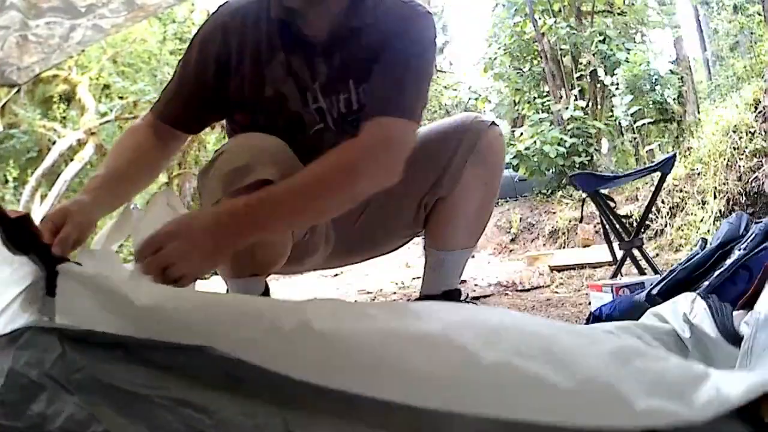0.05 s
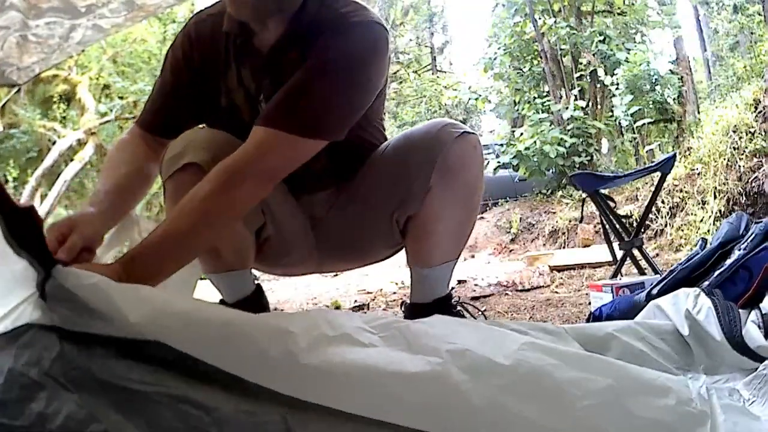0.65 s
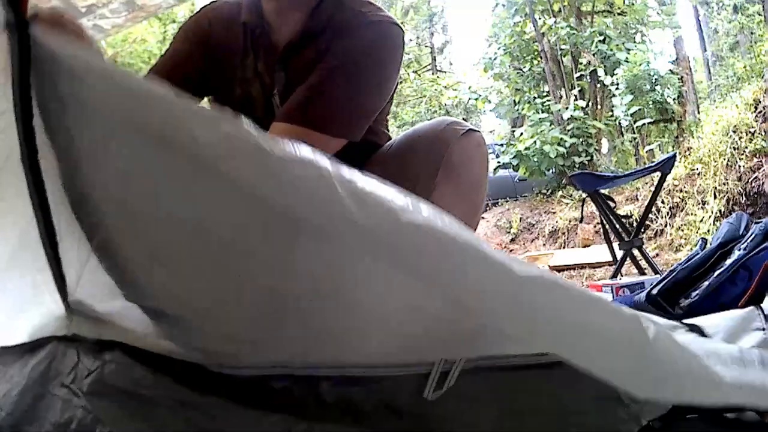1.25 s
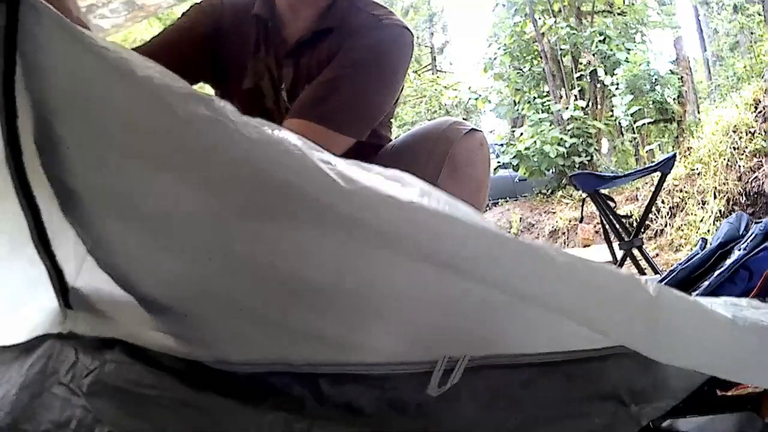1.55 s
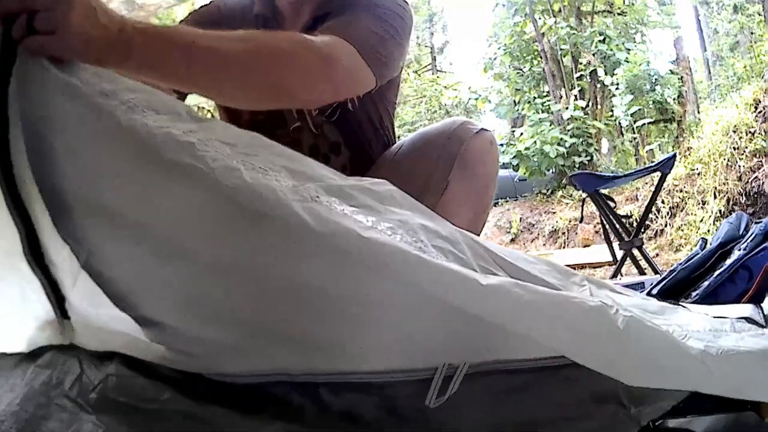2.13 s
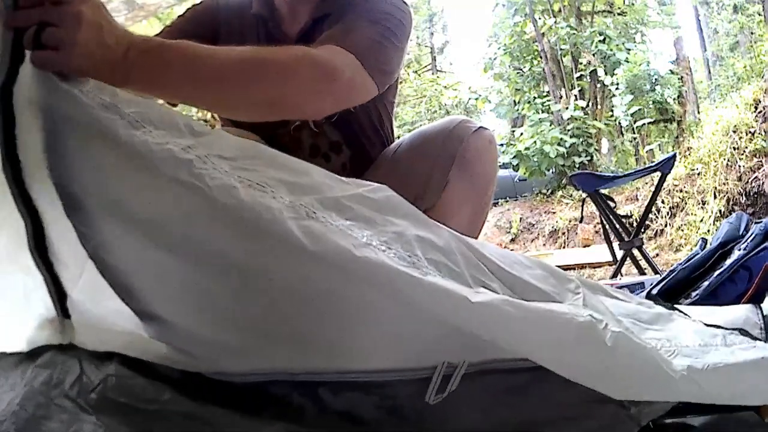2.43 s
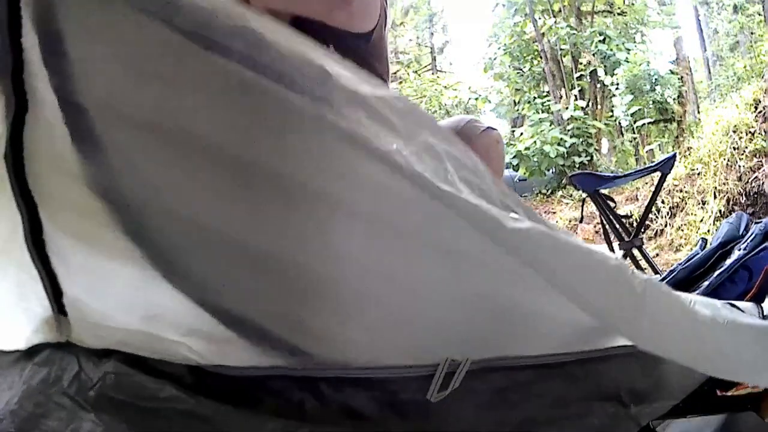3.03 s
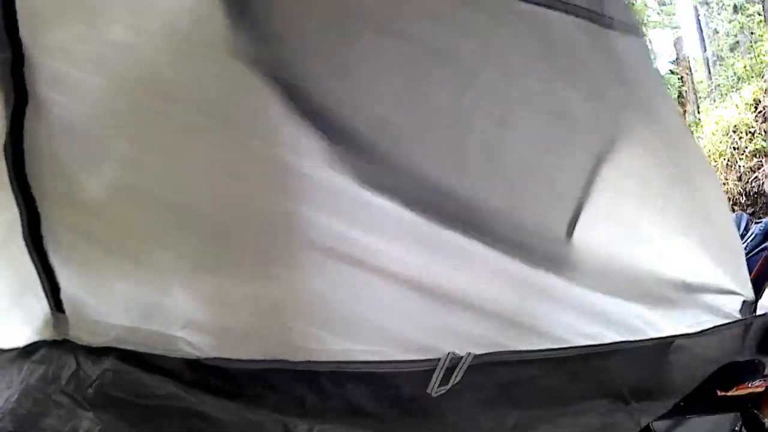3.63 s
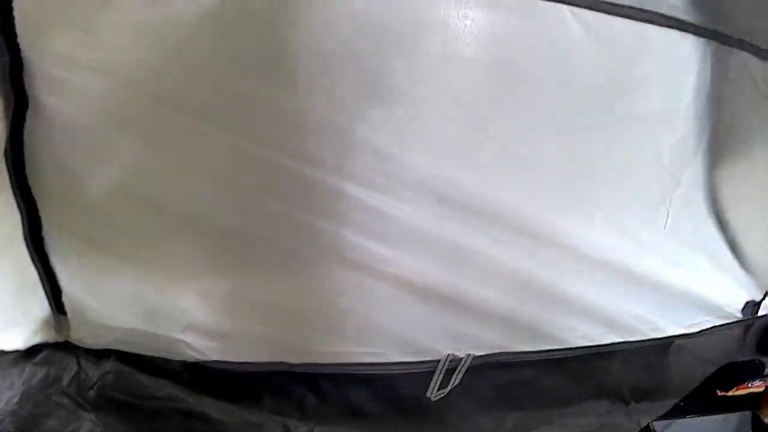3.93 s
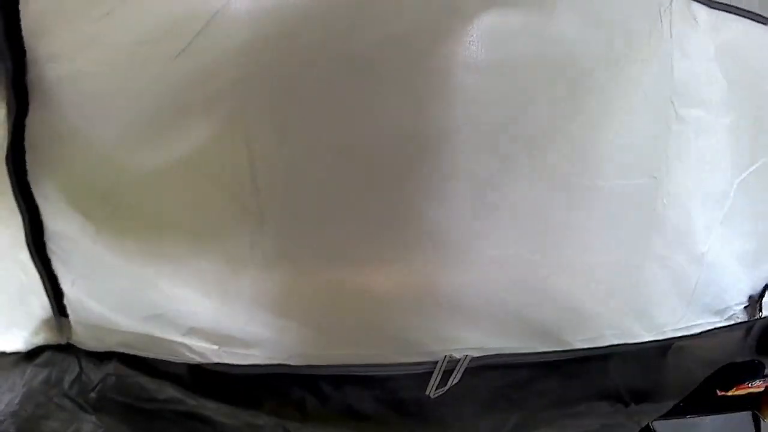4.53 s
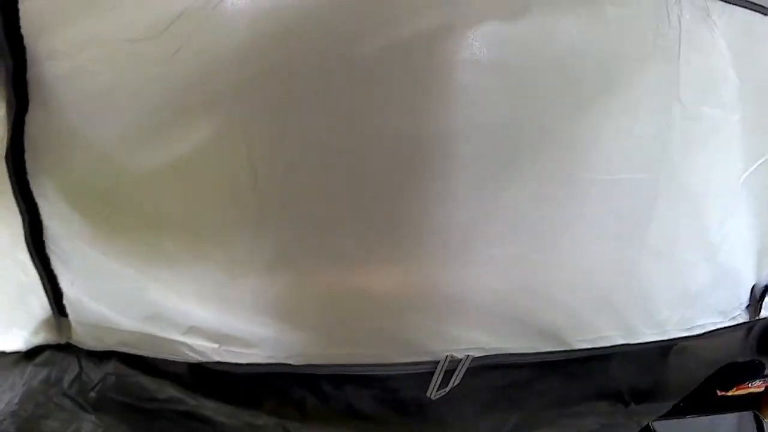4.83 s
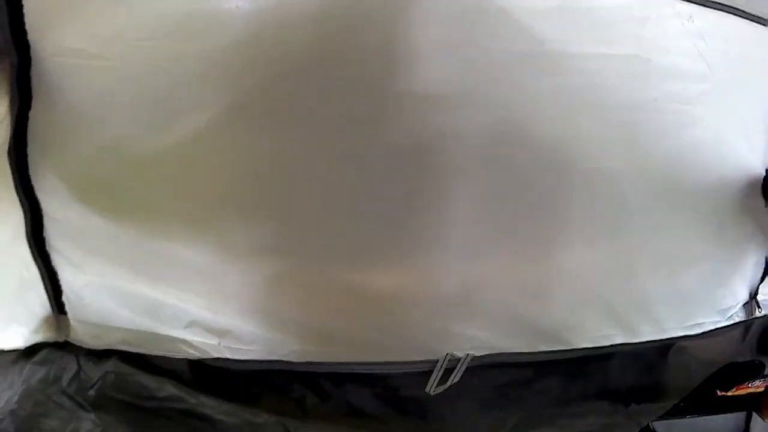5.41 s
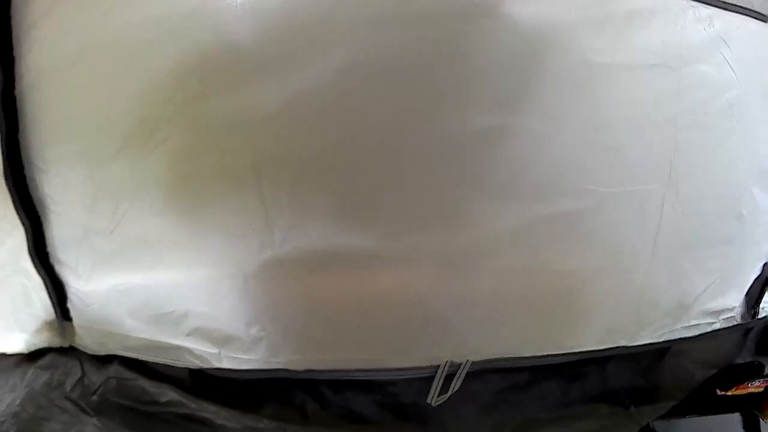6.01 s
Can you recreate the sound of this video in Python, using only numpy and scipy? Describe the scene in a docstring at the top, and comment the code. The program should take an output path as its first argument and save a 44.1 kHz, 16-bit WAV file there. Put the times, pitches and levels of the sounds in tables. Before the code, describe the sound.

A nylon tent door is zipped shut. The fabric crinkles, then the zipper gives a short buzzing pull that ends in a sharp snap. After a pause with light rustling, a longer pull catches and speeds up. The cloth crackles and flaps softly before a last pull closes the door. The sound is boxy and a little muffled, picked up by a small microphone inside the tent over low outdoor air.

```python
"""Zipping a tent shut

A nylon tent door is zipped shut in three uneven pulls, catching and tugging on the way.
The zip's teeth buzz at the speed of the hand, the slider rasps and bites, and the cloth rustles,
crinkles and flaps as it is drawn taut. Zip and cloth share a boxy ring near 650 Hz.
A small camera inside hears it over low outdoor air, joining its 8 kHz samples by straight lines."""
import sys
import numpy as np
from scipy import signal
from scipy.fft import rfft, irfft
from scipy.io import wavfile
from scipy.ndimage import uniform_filter1d, minimum_filter1d, map_coordinates

SR = 44100
rng = np.random.default_rng(int(sys.argv[2]) if len(sys.argv) > 2 else 0)


def waveform_to_disk(signal):
    """Save audio, clipped to [-1, 1], as 16-bit WAV at the path in sys.argv[1]."""
    frames = np.transpose(np.atleast_2d(signal))
    scaled = np.clip(frames, -1, 1) * 32767
    samples = np.round(scaled).astype(np.int16)
    wavfile.write(sys.argv[1], SR, samples)


N = 276330

# The slider bites and jerks, swelling the buzz: middle t/s, length/s, boost/dB, tooth rate f/Hz
SLIDER_BITES = [(1.065, 0.0071, 7, 600), (1.12, .014, 11, 608.4), (2.862, 0.039, 11, 404.5),
                (3.058, .012, 14, 631), (3.347, .023, 14, 557), (3.364, .018, 20, 594.8),
                (3.481, 0.015, 10, 601), (3.501, 0.041, 12.5, 620.5), (3.777, .016, 9, 566),
                (4.988, 0.024, 11.5, 682.2), (5.097, 0.009, 12, 665.3), (5.284, 0.032, 9, 691.3)]
# Tone of the dry rasp and of the cloth's cracks: f/Hz, relative level/dB
RASP_EQ = [(40, 13), (120, 12), (300, 10.5), (700, 8.5), (1100, 8), (1500, 6), (1850, 5), (2250, 5),
           (2600, -2), (3050, -10.5), (3500, -3.5), (3900, -25)]


def undb(db):
    """Decibels to gain."""
    return 10 ** (np.asarray(db) / 20)


def curves(table):
    """The columns of a table, joined by straight lines in time."""
    times, *columns = np.transpose(table)
    return [np.interp(np.arange(N) / SR, times, column) for column in columns]


def colour(x, eq):
    """Minimum-phase filter through (f/Hz, level/dB) points; the result has rms 1."""
    hz, db = np.transpose(eq)
    size = 4096
    bin_hz = np.arange(size // 2 + 1) * SR / size
    response = undb(np.interp(np.log(bin_hz + 1), np.log(hz), db))
    cepstrum = irfft(np.log(response))
    cepstrum[1:size // 2] *= 2
    cepstrum[size // 2 + 1:] = 0
    coloured = signal.fftconvolve(x, irfft(np.exp(rfft(cepstrum))))[:N]
    return coloured / np.std(coloured)


def even(x, size):
    """Hold the rms near 1 over spans of size samples, keeping the faster grain."""
    return x / np.sqrt(uniform_filter1d(uniform_filter1d(x ** 2, size), size) + 1e-9)


def drift(rate):
    """A smooth random curve of spread near 1 that changes about rate times a second."""
    knots = rng.standard_normal(N // 10)
    return map_coordinates(knots, [np.arange(N) / SR * rate], order=2, mode="wrap")


def open_air():
    """A low, steady bed of outdoor air and microphone noise."""
    # Tone of the bed: f/Hz, relative level/dB
    air_eq = [(15, -14), (28, -1.5), (60, -4.5), (130, -5.5), (200, -6.5), (420, -8.5), (550, -12.5),
              (690, -7.5), (900, -13), (1300, -27), (2300, -30), (3800, -45.5)]
    return colour(rng.standard_normal(N), air_eq) * undb(-35.5 + 0.3 * drift(14))


def stick_slip(rate, fade_s, drag):
    """Friction leaps at random moments and eases off, above a steady drag."""
    leaps = (rng.random(N) < rate / SR) * rng.exponential(size=N)
    return drag + signal.lfilter([1], [1, -np.exp(-1 / (fade_s * SR))], leaps)


def grains(rate, spread_db):
    """Tiny clicks of uneven size at random moments; rms 1."""
    clicks = (rng.random(N) < rate / SR) * rng.choice([-1, 1], N)
    clicks = clicks * undb(spread_db * np.minimum(rng.exponential(size=N), 4))
    return clicks / np.std(clicks)


def cloth_friction():
    """Countless small folds slip; the same slips give a dull rustle and a smoother, dry rasp."""
    # Boxy tone of the cloth: f/Hz, relative level/dB
    cloth_eq = [(60, -22), (200, -18), (400, -13.5), (520, -9), (650, 2), (780, -2.5), (900, -9.5),
                (1100, -15), (1400, -19.5), (2000, -34.5), (3500, -58.5)]
    friction = stick_slip(rate=46, fade_s=0.024, drag=1.9)
    folds = grains(rate=3500, spread_db=1.0)
    rustle = colour(friction * (folds + 0.65 * rng.standard_normal(N)), cloth_eq)
    rasp = colour(np.sqrt(friction) * (folds + 1.18 * rng.standard_normal(N)), RASP_EQ)
    return even(rustle, size=1100), even(rasp, size=1300)


def cloth_shifts():
    """Envelopes of rustle and rasp as a hand shifts the cloth: each move rises, holds and settles."""
    # Moves of the cloth: t/s, length/s, rustle level/dB, relative rasp level/dB, fade/s
    moves = [(0, 0.18, -32, -47.5, 0.17), (1.096, 0.033, -11.5, -53, 0.016), (1.2, .08, -37, -52.5, 0.31),
             (1.85, .06, -38.5, -51.5, .08), (2.2, .47, -40, -55.5, .1), (3.962, .2, -26, -46, 0.028),
             (4.191, 0.033, -21.5, -42.5, 0.014), (4.221, 0.12, -23.5, -41.5, 0.037),
             (4.37, 0.24, -34.5, -52.5, .05), (4.489, 0.024, -18.5, -41, 0.017),
             (4.779, 0.16, -26, -38.5, 0.036), (5.092, 0.059, -37, -38, 0.062),
             (5.557, 0.043, -30, -45, 0.093), (6.047, 0.11, -41, -67, .05)]
    t = np.arange(N) / SR
    attack_s = 0.021
    rustle, rasp = undb(-39.5), undb(-56.5)  # the hanging door never lies quite still
    for start, length, rustle_db, rasp_db, fade in moves:
        shape = np.clip((t - start) / attack_s, 0, 1) * np.exp(-np.maximum(t - start - length, 0) / fade)
        rustle = np.hypot(rustle, undb(rustle_db) * shape)
        rasp = np.hypot(rasp, undb(rasp_db) * shape)
    return rustle, rasp


def cloth_jolts(hits, rise_s, fade_s, crack_s, crack_db, wander):
    """Each jolt gives a short crack and a ring of a few cycles, whose pitch wanders with the tension."""
    out, t = np.zeros(N + SR), np.arange(SR // 8) / SR
    noise = colour(rng.standard_normal(N), RASP_EQ)
    bend = np.exp(wander * drift(200))
    swell = (1 - np.exp(-t / rise_s)) * np.exp(-t / fade_s)
    for start, db, hz in hits:
        span = slice(int(start * SR), int(start * SR) + len(t))
        ring = swell / swell.max() * np.sin(2 * np.pi * np.cumsum(hz * bend[span]) / SR)
        crack = undb(crack_db) * np.exp(-t / crack_s) * noise[span]
        out[span] += undb(db) * (ring + crack)
    return out[:N]


def creases():
    """Creases in the nylon snap over with a tight, boxy tick."""
    # Snaps: t/s, peak level/dB, ring f/Hz
    snaps = [(0.071, -17, 740), (0.173, -17, 740), (0.227, -14, 800), (0.384, -25, 600), (0.634, -14, 730),
             (0.71, -17, 710), (1.119, -4, 930), (1.443, -20, 760), (2.601, -21, 680), (2.736, -17, 660),
             (2.785, -10, 740), (3.084, -5, 760), (4.13, -12, 690), (4.194, -10, 740), (4.227, -13, 690),
             (4.335, -14, 650), (4.349, -13, 650), (4.491, -10, 670), (4.497, -6, 720), (4.636, -15, 690),
             (4.718, -8, 650), (5.424, -18, 650), (5.501, -19, 540), (6.078, -24, 620)]
    return cloth_jolts(snaps, rise_s=0.00097, fade_s=0.0027, crack_s=0.019, crack_db=-27, wander=0.05)


def door_flaps():
    """The slack door flaps with a soft, low thud."""
    # Thuds: t/s, peak level/dB, ring f/Hz
    thuds = [(0.165, -32.5, 170), (0.638, -22, 153), (0.698, -12, 346), (2.745, -23, 145), (2.79, -18, 226),
             (3.018, -14.5, 214), (4.23, -30, 85), (4.33, -29, 71), (4.495, -26, 101.7), (5.6, -25, 106.1)]
    return cloth_jolts(thuds, rise_s=0.012, fade_s=0.009, crack_s=0.026, crack_db=-26.5, wander=0.16)


def hand_pulls():
    """The hand draws the slider in three uneven pulls; the faster it runs, the cleaner the buzz."""
    # Motion of the hand, tug by tug: t/s, tooth rate f/Hz, effort level/dB
    opening = [(0.643, 270, -23), (0.71, 354, -24), (0.83, 430, -22), (0.90, 540.2, -18.5),
               (0.985, 554.2, -20), (1.06, 593.5, -10), (1.125, 588, -13.5), (1.165, 555.5, -19),
               (1.20, 368, -18)]  # first pull
    short = [(2.70, 300, -35.5), (2.82, 364.8, -20), (2.85, 392.2, -18), (2.895, 484.9, -16.5),
             (2.96, 513, -18)]  # the second pull starts here
    rising = [(3.01, 414.8, -23.5), (3.095, 465.3, -16.5), (3.19, 608.3, -12.5), (3.25, 532.7, -15.5),
              (3.31, 472.2, -22.5)]
    snagged = [(3.335, 460.6, -11.5), (3.385, 440, -18.5), (3.425, 415.4, -11.5), (3.462, 455.5, -14)]
    long = [(3.48, 585, -15), (3.52, 676, -11), (3.555, 752.5, -8.5), (3.64, 770.3, -23.5),
            (3.70, 754, -16), (3.76, 611.6, -19), (3.815, 497, -25.5), (3.93, 430.6, -24.5),
            (4.04, 369.6, -31.5)]
    slow = [(4.645, 440, -22), (4.71, 475, -19.5), (4.78, 536, -18.5), (4.86, 519.3, -21.5),
            (4.915, 544.7, -15.5), (4.96, 569.6, -17.5), (5.05, 536, -15)]  # the third pull starts here
    closing = [(5.075, 521.6, -18.5), (5.14, 755, -16.5), (5.23, 833.7, -16.5), (5.295, 687, -19),
               (5.335, 654, -22), (5.40, 476, -30.5), (5.52, 377, -27.5), (5.555, 285, -27)]
    # How the zip runs: motion, relative rasp level/dB, buzz over cloth/dB, gain of the second tooth row
    tugs = [(opening, -36.5, 0.44, 0.29), (short, -42.5, 8, 0.42), (rising, -40, 4.6, 0.53),
            (snagged, -43.5, 3.16, .05), (long, -43.5, 6.99, 0.2), (slow, -43.5, 1.68, .15),
            (closing, -40.5, 3.3, 0.42)]
    usual_hz, usual_db = 544, -20.5  # speed and effort at which the listed rasp and buzz hold
    attack_s, release_s = 0.036, 0.032
    t = np.arange(N) / SR
    tooth_hz, effort_db = curves([point for motion, *_ in tugs for point in motion])
    run_points = [(motion[end][0], *run) for motion, *run in tugs for end in (0, -1)]
    rasp_db, buzz_db, second_row = curves(run_points)
    spans = [(motion[0][0], motion[-1][0]) for motion, *_ in tugs]
    gates = [np.interp(t, [on - attack_s, on, off, off + release_s], [0, 1, 1, 0]) for on, off in spans]
    grip = np.minimum(sum(gates), 1)
    for middle, length, _, hz in SLIDER_BITES:
        jerk = np.exp(-np.square((t - middle) / (1.1 * length)))  # outlasts the bite
        tooth_hz += (hz - tooth_hz) * jerk
    octaves = np.log2(tooth_hz / usual_hz)
    buzz_power = undb(buzz_db + 15 * octaves) ** 2
    buzz_share = buzz_power / (1 + buzz_power)
    rasp_db += 0.13 * (effort_db - usual_db) + 2 * octaves  # harder and faster tugs rasp more
    return tooth_hz, grip * undb(effort_db), grip * undb(rasp_db), buzz_share, second_row


def tooth_row(phase, scatter_db=0.85):
    """One tooth clicks at each whole turn of the phase, shared between two samples."""
    at = np.flatnonzero(np.diff(np.floor(phase)) > 0)
    overshoot = (phase[at + 1] % 1) / (phase[at + 1] - phase[at])
    size = undb(scatter_db * rng.standard_normal(N)[:len(at)])
    return np.bincount(at, size * overshoot, N) + np.bincount(at + 1, size * (1 - overshoot), N)


def zip_buzz(phase, second_row, unsteady):
    """Teeth of the two tapes mesh in turn; the slider moves in small jerks and sometimes bites."""
    # Boxy tone of the teeth: f/Hz, relative level/dB
    tooth_eq = [(100, -26), (300, -15.5), (440, -4), (620, 2.5), (780, 2), (1000, -13.5), (1200, -18),
                (1600, -26.5), (2000, -31), (3500, -55.5)]
    clicks = tooth_row(phase) + second_row * tooth_row(phase + .5)
    clicks -= uniform_filter1d(clicks, size=300)  # the steady drag makes no sound
    flutter = undb(4.5 * unsteady * drift(110))
    buzz = even(colour(clicks, tooth_eq) * flutter, size=900)
    hum = signal.sosfiltfilt(signal.butter(4, 650, fs=SR, output="sos"), buzz)
    chatter = 0.22  # the slider rocks, so the overtones come and go
    overtones = (buzz - hum) * (1 + chatter * drift(90)) / np.hypot(1, chatter)
    # a bite starts and ends abruptly and swells the hum more than the overtones
    t = np.arange(N) / SR
    bites = [db * np.exp(-(2 * (t - middle) / length) ** 4) for middle, length, db, _ in SLIDER_BITES]
    bite_db = np.max(bites, axis=0)
    return hum * undb(bite_db) + overtones * undb(0.64 * bite_db)


def slider_ring(phase):
    """The metal slider scrapes once a tooth, and rings with it."""
    # Resonance of the slider: f/Hz, relative level/dB
    metal_eq = [(1200, -28), (1950, -11), (2250, 1), (2550, -5), (3000, -16), (3700, -17)]
    scrape = rng.standard_normal(N) * np.exp(-(phase % 1) / 0.47)
    return colour(scrape * undb(4.5 * drift(45)), metal_eq)


def scene():
    """The hand's effort is shared between the zip's buzz and the rustling cloth."""
    tooth_hz, effort, scraping, buzz_share, second_row = hand_pulls()
    shift_rustle, shift_rasp = cloth_shifts()
    unsteady = 1.6 - buzz_share  # a free-running slider is the steadiest
    wobble = np.exp(unsteady * (0.056 * drift(300) + 0.0244 * drift(55)))
    phase = np.cumsum(tooth_hz * wobble) / SR  # one turn a tooth
    buzz = undb(1) * effort * np.sqrt(buzz_share) * zip_buzz(phase, second_row, unsteady)
    rustle_grain, rasp_grain = cloth_friction()
    rustle = np.hypot(effort * np.sqrt(1 - buzz_share), shift_rustle) * rustle_grain
    rasp = undb(7.5) * np.hypot(scraping, shift_rasp) * rasp_grain
    slider = undb(0.5) * scraping * np.sqrt(buzz_share) * slider_ring(phase)
    return (buzz + rustle + rasp + slider + creases() + door_flaps() + open_air())[None]


def limiter(x, knee, slope):
    """The gain dips for a few milliseconds round each peak above the knee; the biggest poke through."""
    gain = (knee / np.maximum(np.abs(x), knee)) ** slope
    return x * uniform_filter1d(minimum_filter1d(gain, size=200), size=200)


def record(dry):
    """The camera limits, samples slowly and clips; joining its samples adds a faint mirrored treble."""
    camera_hz, band_hz, top_hz = 8000, 3900, 15650
    t = np.arange(N) / SR
    ticks = np.arange(N * camera_hz // SR + 1) / camera_hz
    held = limiter(dry[0], knee=.98, slope=.8)
    narrow = signal.sosfilt(signal.ellip(8, .1, 60, band_hz, fs=SR, output="sos"), held)
    samples = np.clip(map_coordinates(narrow, [ticks * SR], order=3), -1, 1)
    joined = np.interp(t, ticks, samples)
    return signal.sosfilt(signal.ellip(10, .1, 70, top_hz, fs=SR, output="sos"), joined)[None]


dry = scene()
out = record(dry)
waveform_to_disk(out)
```